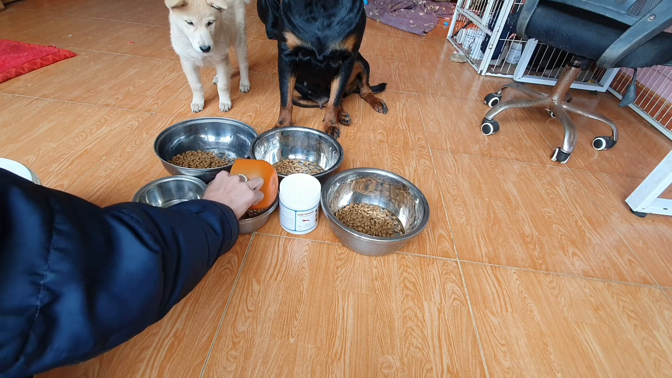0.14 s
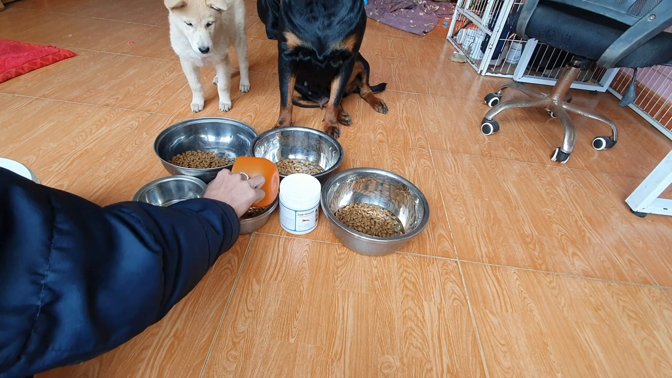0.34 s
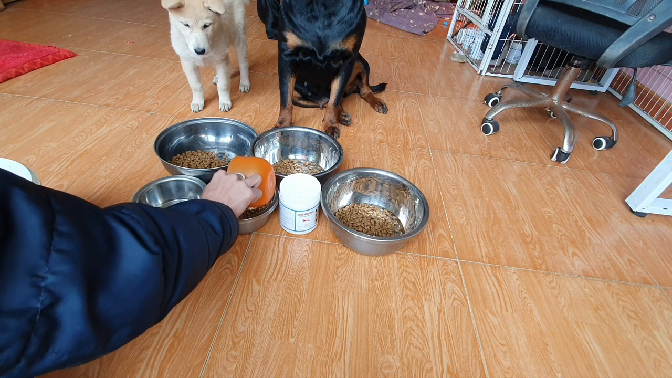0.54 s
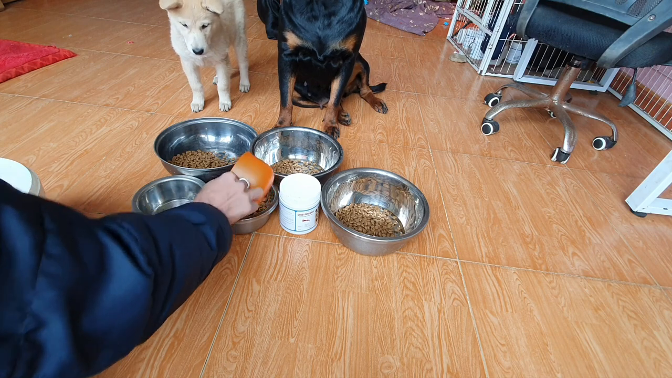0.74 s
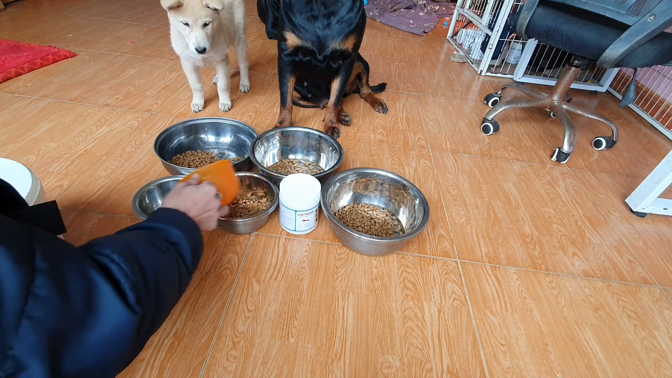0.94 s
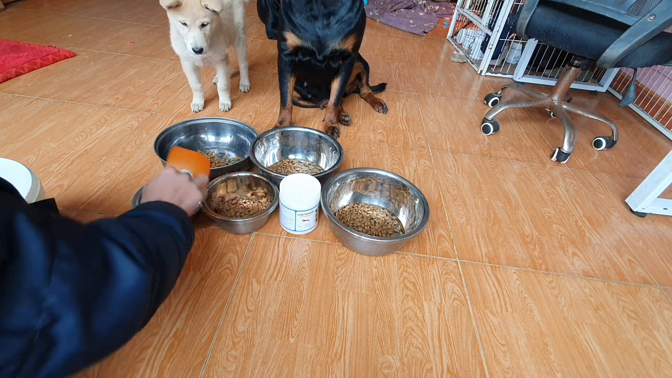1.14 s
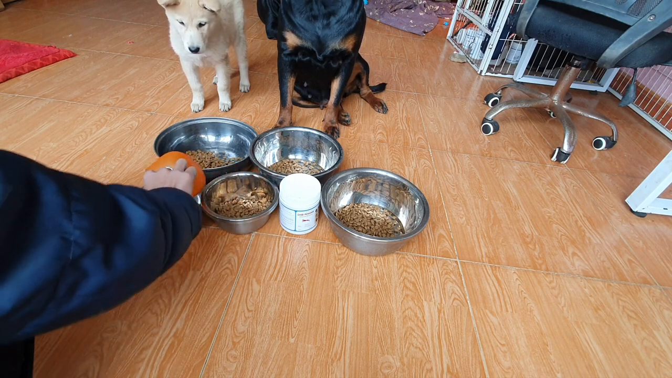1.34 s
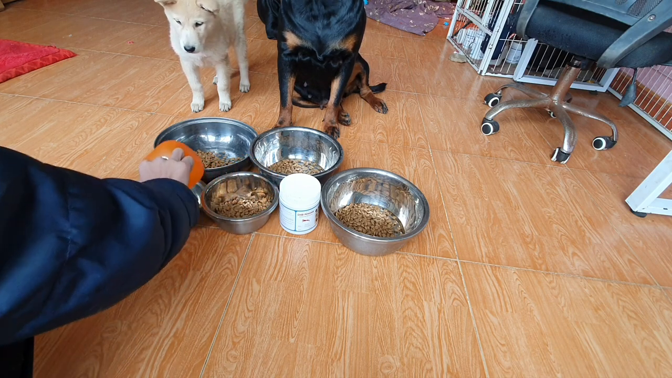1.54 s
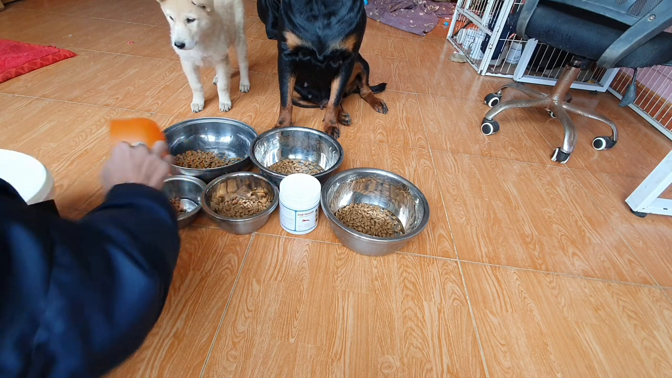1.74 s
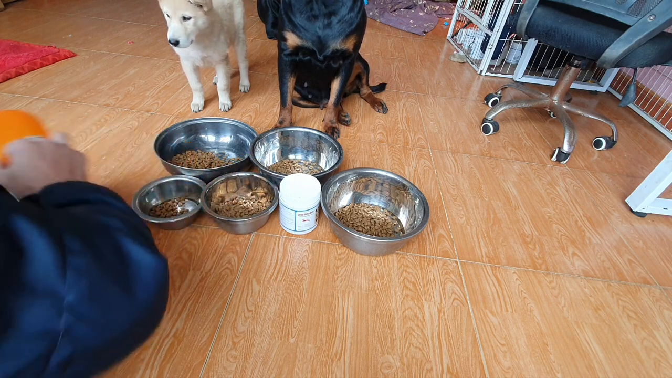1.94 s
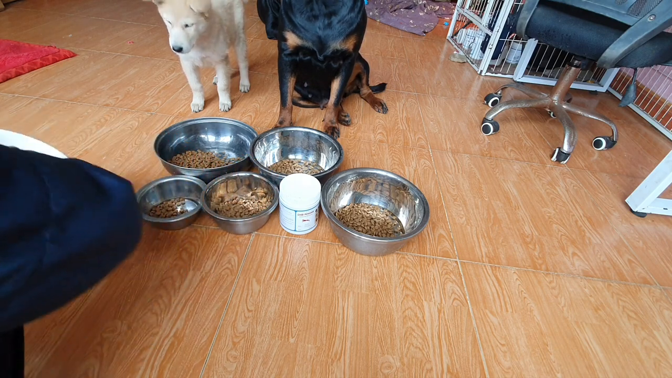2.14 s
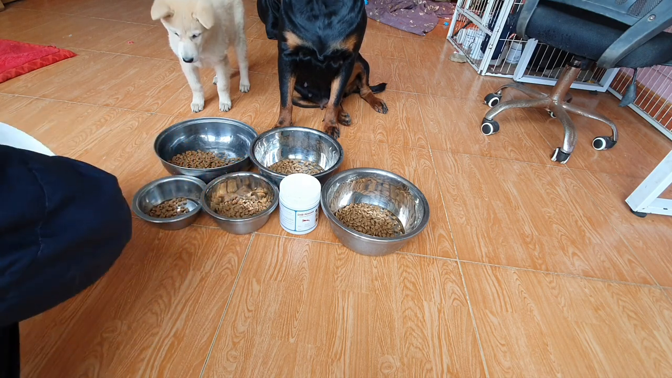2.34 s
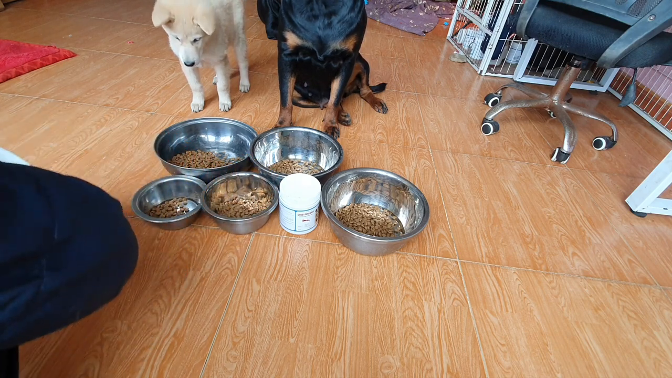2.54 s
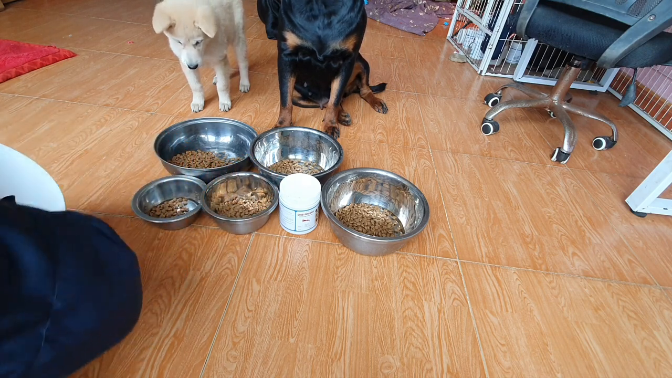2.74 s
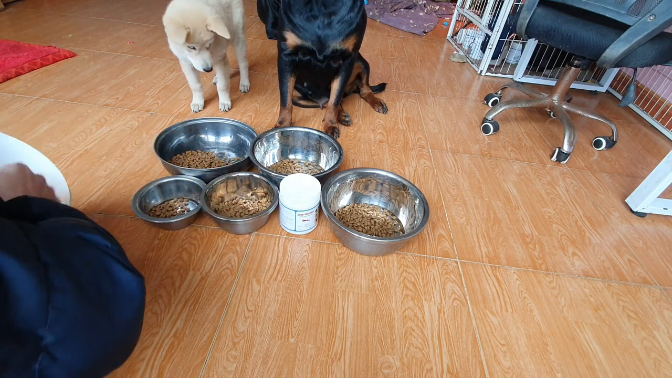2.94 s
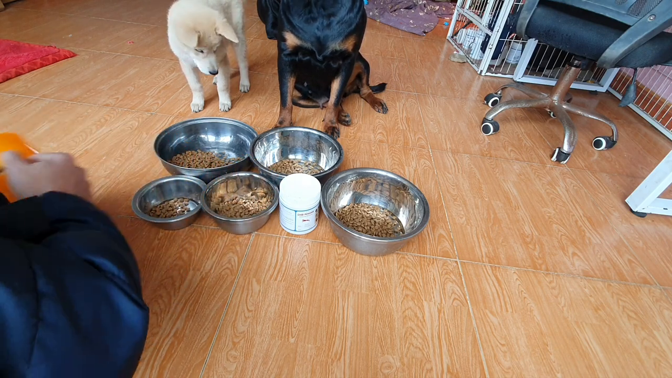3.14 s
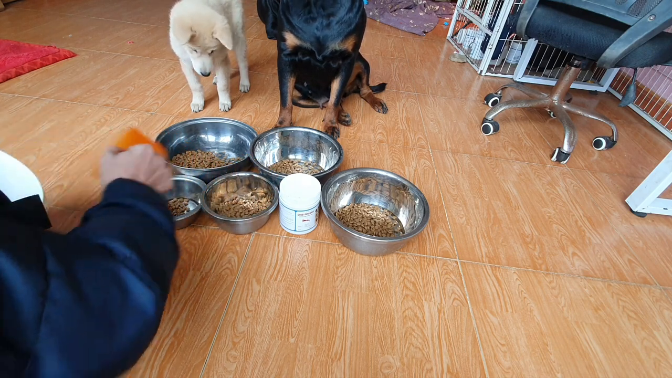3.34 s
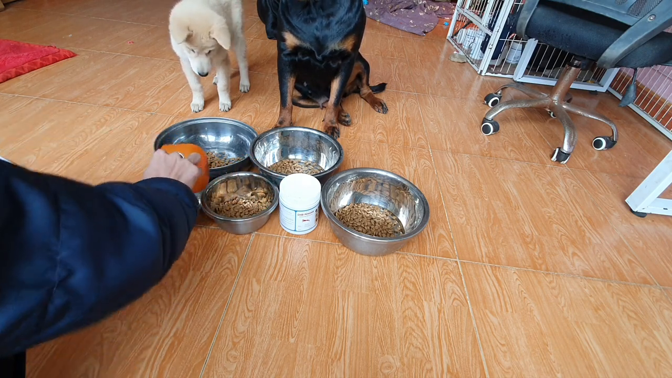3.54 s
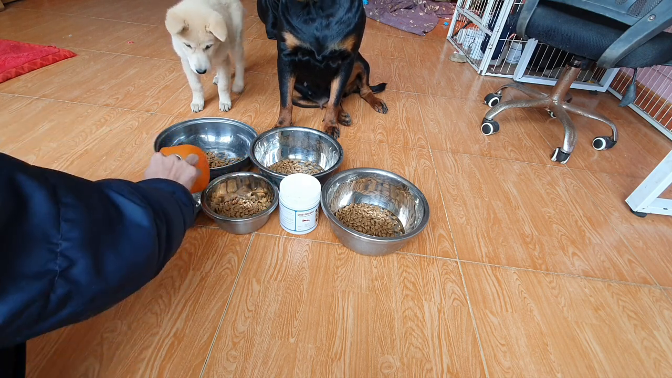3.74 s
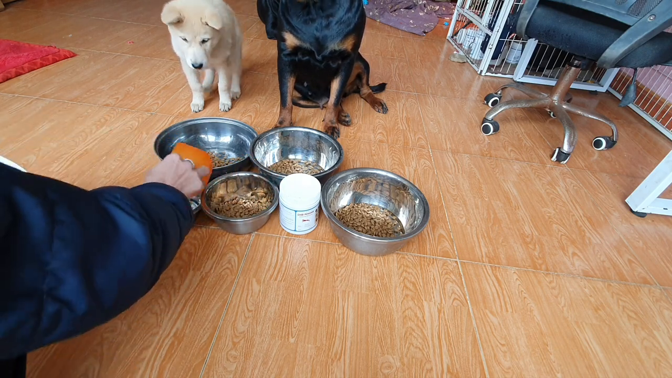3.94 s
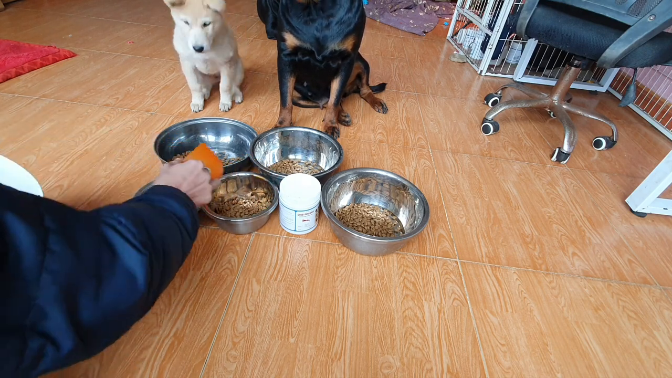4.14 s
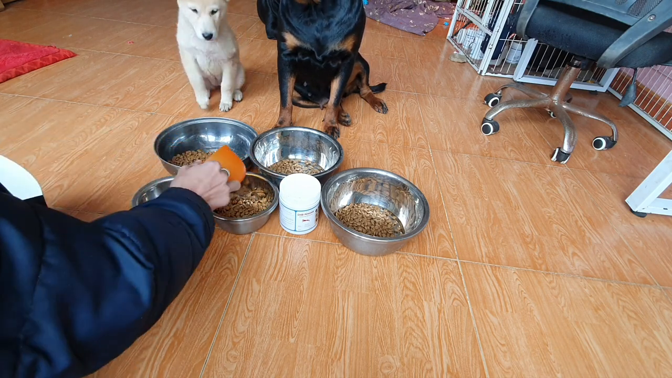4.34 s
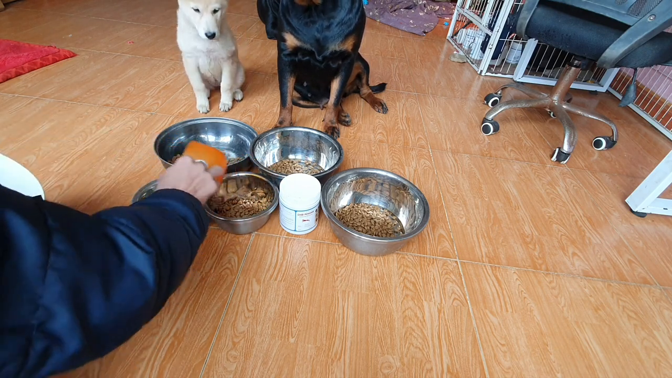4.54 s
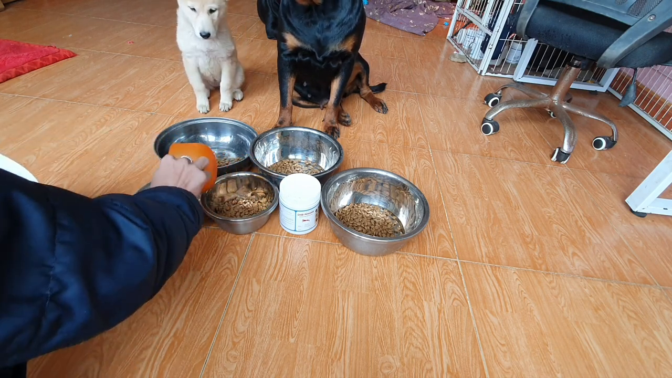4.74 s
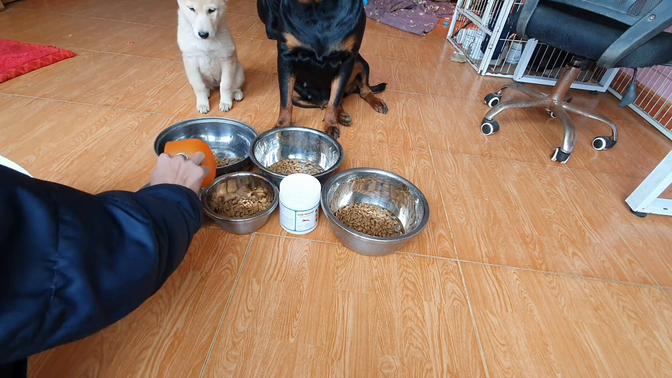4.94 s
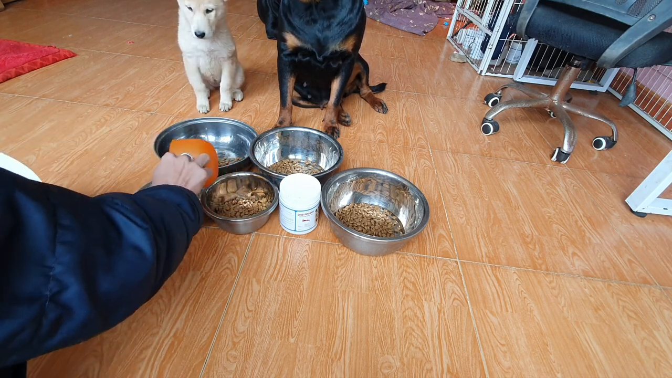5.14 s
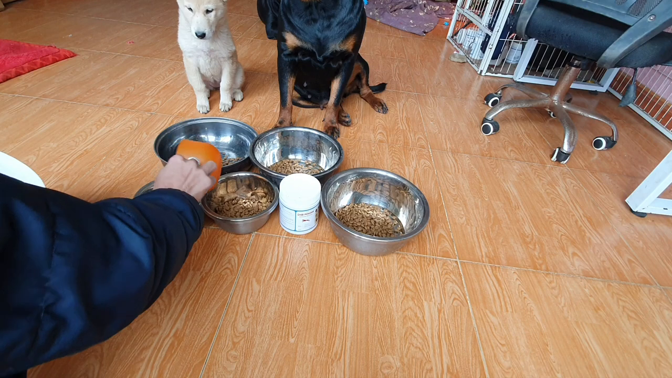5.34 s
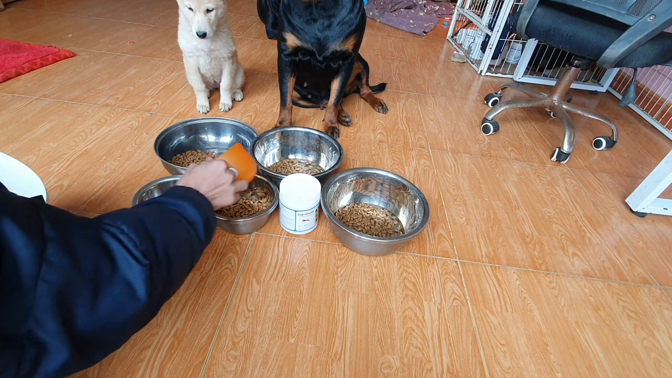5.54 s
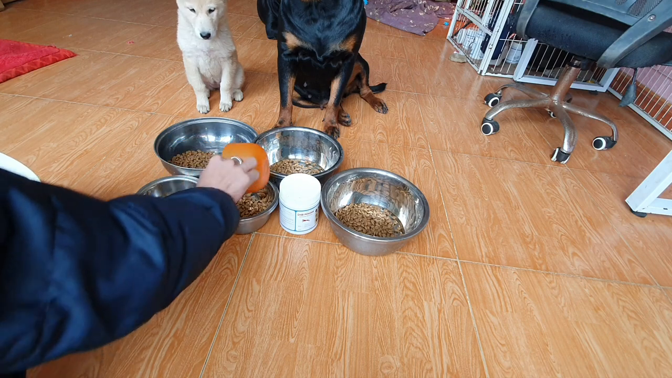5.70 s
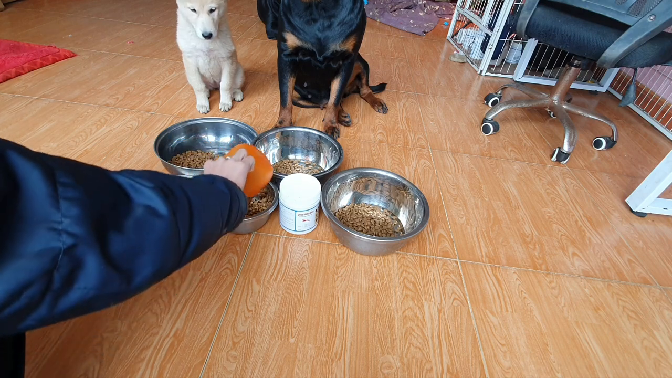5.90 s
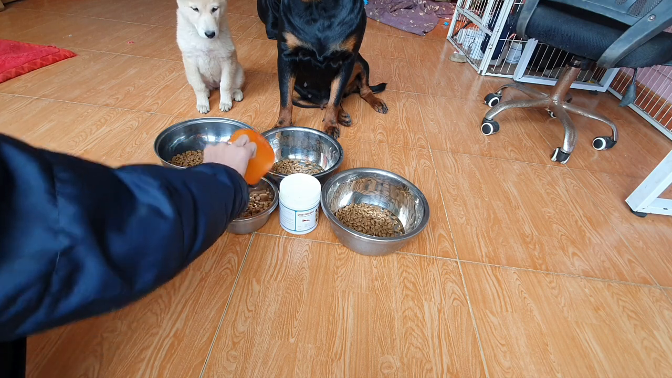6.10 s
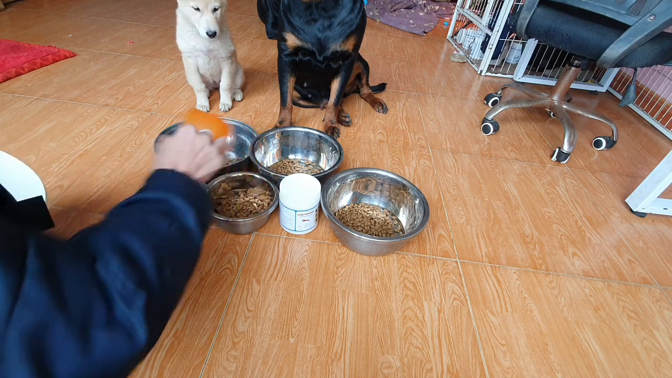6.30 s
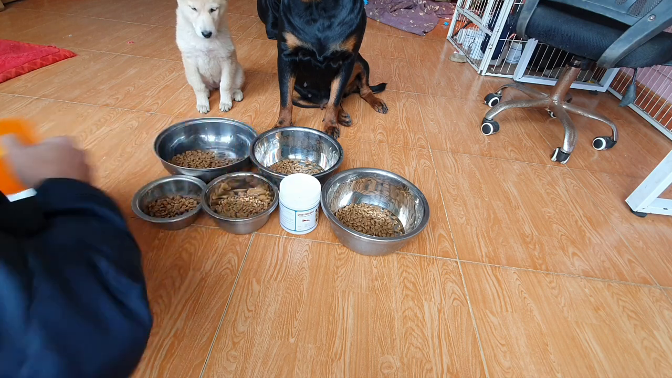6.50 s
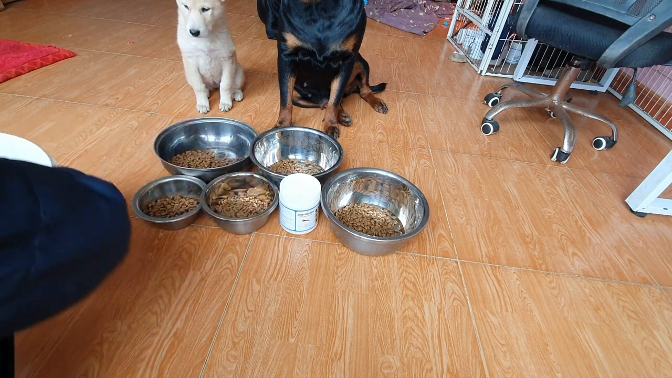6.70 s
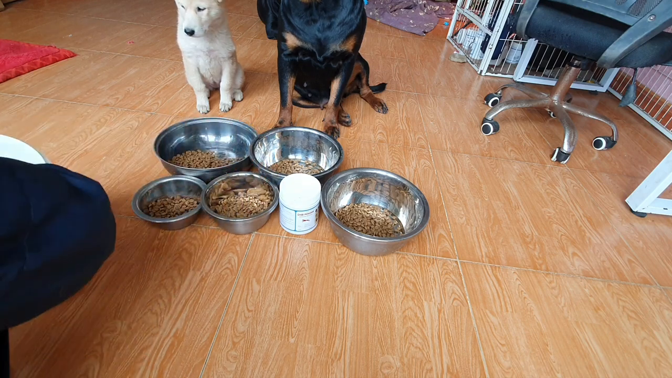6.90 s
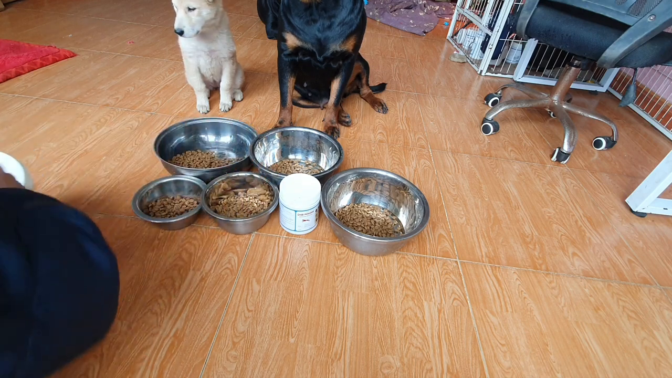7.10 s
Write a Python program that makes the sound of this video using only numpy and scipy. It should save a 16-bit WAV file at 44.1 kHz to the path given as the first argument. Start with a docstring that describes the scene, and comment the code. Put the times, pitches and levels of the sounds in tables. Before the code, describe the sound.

A small, hard-floored room with a faint low hum, heard in stereo from close by. From 0 to 1.2 seconds thin runs of dry pet food trickle off a plastic scoop into a small steel bowl, with scattered bright chinks, the sharpest near 0.5. At 1.5 the rest drops in a dense, short rattle. Soft bumps and sleeve swishes follow. From 2.2 to 3.1 the scoop digs into a plastic bucket at left: coarse crunching, snapping pieces, boomy wall and hollow knocks around 2.4 and 2.6. A thud comes at 3.5. From 3.7 to 4.4 food slides and pours with crackle, patter and light bowl taps; a quieter pour runs 5.1 to 5.6. Around 6.1 a last spill clinks brightly while the sleeve drags over a large bowl, making it ring faintly. After a swish, digging resumes at 6.8, with a strong bucket knock at 7.0, grinding on to the end.

```python
"""Pet food shaken into steel bowls

Dry food falls from a plastic scoop into steel bowls, in a room with a faint hum.
Running food is made of many tiny noise cracks; bowls, scoop and bucket ring as sums of dying sines.
A sleeve, made of dense fine grains, swishes and drags over a large bowl, setting it ringing.
Twice the scoop digs into a plastic bucket on the left: grinding grains, knocks and a booming wall."""
import sys
import numpy as np
from scipy import signal
from scipy.fft import rfft, irfft
from scipy.io import wavfile

SR = 44100
rng = np.random.default_rng(int(sys.argv[2]) if len(sys.argv) > 2 else 0)


def master_out(mix):
    """Clip the mix to full scale and print it as 16-bit PCM to the path in sys.argv[1]."""
    frames = np.transpose(np.atleast_2d(mix))
    ceiling = np.clip(frames, -1, 1)
    pcm = np.round(ceiling * 32767).astype(np.int16)
    wavfile.write(sys.argv[1], SR, pcm)


N = 320273
T = np.arange(N) / SR  # time in seconds

# Levels in the tables are relative: each layer adds its own gain. t60_s and fade_s: time to fall by 60 dB.
# thin runs of food into the small bowl: start_s, rise_s, hold_s, fade_s, crackle_db, heap_patter_db
TRICKLES = [(0.0, 0.0011, 0.32, 0.89, -63.5, -60.5), (0.33, 0.081, 0.14, 1, -59, -70),
            (0.705, 0.0047, 0.21, 0.55, -62.5, -71.5), (6.105, 0.005, 0.034, 0.43, -53.5, -51)]
# dense streams into the part-filled bowl: start_s, rise_s, hold_s, fade_s, crackle_db, heap_patter_db
POURS = [(3.79, 0.081, 0.08, 0.76, -53.5, -48), (5.095, 0.042, 0.19, 0.38, -61.5, -53.5)]
# the rest of the scoop tipped out: start_s, rise_s, hold_s, fade_s, rattle_db, heap_patter_db
DUMP = [(1.412, 0.061, 0.065, .2, -69, -62.5), (1.499, 0.0032, 0.024, 0.42, -35.5, -34.5)]
# food sliding inside the tipped or jerked scoop: start_s, rise_s, hold_s, fade_s, level_db
SLIDES = [(1.385, 0.045, 0.038, 0.2, -50), (3.68, 0.08, 0.011, 0.17, -50), (4.295, 0.017, 0.13, 0.1, -65.5),
          (4.725, 0.0029, 0.0054, 0.16, -64), (4.843, 0.009, 0.011, 0.086, -68),
          (5.454, 0.0039, .01, 0.13, -71.5), (5.661, 0.0015, 0.0036, 0.1, -45.5),
          (5.925, 0.073, 0.042, 0.71, -51.5)]
# strokes of the scoop through the food in the bucket: start_s, rise_s, hold_s, fade_s, crunch_db, wall_boom_db
DIGS = [(2.16, 0.011, 0.094, 0.23, -54, -58), (2.378, 0.012, 0.12, 1, -33.5, -28),
        (2.68, 0.14, 0.071, 0.34, -35.5, -31.5), (2.93, 0.031, 0.032, 0.15, -47, -41.5),
        (6.815, 0.016, .005, 0.098, -42, -33.5), (6.9, 0.037, 0.0065, 0.089, -50, -50),
        (6.988, 0.014, 0.0071, 0.48, -44, -22.5)]
# the sleeve swishing through the air: start_s, rise_s, hold_s, fade_s, level_db
SWISHES = [(0.0, 0.077, 0.28, 2.1, -61), (1.655, 0.011, 0.2, 0.49, -54.5),
           (1.968, 0.0041, 0.0038, 0.59, -52), (5.92, 0.15, 0.037, 0.33, -57),
           (6.615, 0.016, 0.2, 0.26, -58.5)]
# the sleeve dragging over the rim of the large bowl: start_s, rise_s, hold_s, fade_s, level_db
BRUSH = [(5.992, 0.014, 0.097, 0.21, -45), (6.07, 0.065, 0.25, 0.98, -46)]
# pieces on the bare small bowl: start_s, splash_db, splash_tilt_db_per_octave, ring_db, ring_tilt_db_per_octave
CHINKS = [(0.0402, -29, 8, -43, -3.5), (0.2311, -33.5, 11, -52, -2), (0.2552, -31, -12, -36, -0.5),
          (0.3648, -38, 8, -52, -3), (0.38, -34, 16, -52, -4), (0.4276, -44, -7, -35, 1.5),
          (0.5233, -19, -11, -23, 3.5), (0.8172, -29.5, -30, -32, -0.5), (0.9244, -35, -3, -33, -1.5),
          (0.9801, -29, 25, -46, 7), (6.101, -25, 3, -34, 2), (6.1145, -31, 23, -44, 2),
          (6.134, -17, 7, -29, -5.5), (6.1677, -38, 4, -41, 2), (6.2343, -43.5, -18, -50, 2)]
# taps of the scoop's rim on the part-filled bowl:
# start_s, splash_db, splash_tilt_db_per_octave, ring_db, ring_tilt_db_per_octave
FILLED_BOWL_TAPS = [(3.937, -52, -6, -44, 15), (3.971, -34.5, 0, -41, -3), (4.088, -39, 9, -43, 14),
                    (4.27, -57, 0, -56.5, -4)]
# clumps of food clacking against the scoop: start_s, level_db, treble_db (added to level_db)
CLACKS = [(0.363, -37.5, -3.5), (0.399, -45.5, -23), (0.7596, -41.5, -2), (0.9967, -40.5, -11),
          (1.505, -31.5, 0), (1.742, -50.5, -3), (2.576, -34.5, -0.5), (2.599, -29.5, -8), (2.731, -33, -9),
          (2.775, -31.5, -5), (2.795, -30.5, -8), (2.852, -27.5, -10.5), (2.8921, -31.5, -13),
          (2.981, -47.5, -20.5), (3.016, -36.5, -25), (3.287, -62.5, -6.5), (3.885, -46, -1),
          (3.936, -44, 2.5), (4.049, -46.5, -4), (4.09, -44, 4.5), (4.12, -43.5, -1.5), (4.383, -51, 7),
          (5.102, -59.5, 2.5), (5.133, -49.5, -14), (5.245, -47, -5), (5.302, -53, 3), (5.374, -48, -7),
          (5.476, -60, -3), (5.662, -44.5, 5)]
# stabs of the scoop into the food: start_s, crunch_db, bright_snap_db
STABS = [(2.243, -40, -77), (2.305, -36.5, -47), (2.344, -29.5, -37), (2.386, -28.5, -35),
         (3.504, -42, -88), (6.827, -35.5, -70), (6.96, -36, -50), (6.996, -30.5, -69)]
# knocks on the bucket: start_s, level_db, ring_time_factor (no unit), rebound_delay_s, left_minus_right_db
KNOCKS = [(2.386, -16.5, 1.86, 0.016, 7), (2.428, -13, 1.16, 0.02, 9), (2.575, -20, 1.1, 0.032, 1),
          (3.497, -20.5, 0.93, .014, -1), (6.992, -12.5, 0.99, 0.01345, 2.5)]
# soft bumps of arm, knee and scoop; near 600-710 Hz, clumps landing on the heap: start_s, level_db, pitch_hz
BUMPS = [(0.32, -31, 897), (1.68, -29, 145.5), (1.70, -31.5, 315), (1.825, -54, 264), (1.981, -33.5, 135),
         (2.348, -25, 139.5), (2.449, -22.5, 128.3), (3.498, -27, 151), (3.755, -35.5, 128.6),
         (3.809, -33.5, 710), (4.054, -33, 71.6), (5.112, -41, 600), (5.205, -34, 694), (5.578, -43, 626),
         (5.999, -46, 286), (6.963, -28.5, 145.3)]

# ringing tones of the small steel bowl: pitch_hz, level_db, t60_s
SMALL_BOWL = [(867, -6, .25), (1707, -1, .24), (2686, 2.5, 0.22), (3074, 0, 0.3), (3381, 0, 0.092),
              (3635, -1, 0.18), (3930, -6, 0.26), (4312, -10, 0.33), (4790, -11, 0.28), (5771, -13, .28),
              (6196, -3, 0.18), (6300, -6, 0.12), (6780, -6, 0.16), (7000, -7, 0.18), (8680, -5, .17),
              (9130, -2, 0.2), (9350, -2, 0.18), (9800, -5, 0.18)]
# ringing tones of the large steel bowl: pitch_hz, level_db, t60_s
LARGE_BOWL = [(278, 1, .5), (296, 5, 0.7), (474, -8, 0.8), (517, -10, 0.8), (598, -2, .5), (630, 0, 0.7),
              (673, -6, 1.1), (759, -8, 0.78), (829, -11, 1), (862, -8, .7), (974, -2, 0.85),
              (1025, -6, .4), (1104, -1, 0.83), (1244, 3, 0.7), (1324, -7, 1), (1486, -10, .6),
              (1728, -6, .5), (1776, -8, .6), (1890, -4, 0.6), (2105, -5, 0.5), (2196, -5, .5),
              (2650, -2, .3)]
# ringing tones of the part-filled bowl: pitch_hz, level_db, t60_s
FILLED_BOWL = [(760, -8, 0.38), (802, -5.5, 0.52), (2120, 1, 0.34), (2150, 8, 0.52), (3085, 5, 0.28),
               (3080, 9, 0.33), (3478, 5, .25), (5500, 8, 0.1), (5560, -14, .1), (5670, 5, 0.1),
               (6340, -3, .15)]
# ringing tones of the bucket, before the knock's factor: pitch_hz, level_db, t60_s
BUCKET = [(291, -9, 0.4), (322, -5, .13), (350, 2, 0.085), (361, -9, .35), (410, -12, .07),
          (441, -10, 0.13), (484, -11, 0.25), (520, -8, .12), (575, -12, .13), (660, -17, 0.22),
          (800, -12, .12)]
# ringing tones of the plastic scoop: pitch_hz, level_db, t60_s
SCOOP = [(820, -7, .08), (1530, 1, .09), (1595, 1, .13), (2250, -4, .04), (2570, 0, .06), (2850, 2, .12),
         (3074, 3, .13), (3515, 0, .14), (4450, 4, .025), (4680, 3, .025)]

# tone colour of trickling food: pitch_hz, level_db
TRICKLE_COLOUR = [(1000, -2), (1600, 2), (2600, 4.5), (3600, 8), (5000, 3), (6300, 0.5), (7600, -1),
                  (10500, -1.5), (14000, -22)]
# tone colour of poured food: pitch_hz, level_db
POUR_COLOUR = [(1300, -13), (1900, 4.5), (2600, -2.5), (3500, 3), (4200, -3.5), (4900, -7.5), (5900, -7),
               (7500, -12), (10500, -6), (13000, -16), (14500, -20)]
# tone colour of dumped food: pitch_hz, level_db
DUMP_COLOUR = [(760, -25), (1300, -11), (1540, -42), (1850, 4.5), (1970, -4.5), (2130, -1), (2360, -8),
               (2560, 0), (2740, -24), (3030, -2.5), (3360, -16), (3710, -1.5), (4150, -9), (5340, -15.5),
               (12000, -15.5), (14500, -33)]
# tone colour of food sliding in the scoop: pitch_hz, level_db
SLIDE_COLOUR = [(2300, -8), (3200, -5), (3900, 2), (5300, -5.5), (7300, -13), (9600, -5), (12500, -18.5),
                (14500, -32)]
# tone colour of the patter on the heap: pitch_hz, level_db
HEAP_COLOUR = [(350, -10.5), (470, -13), (585, -4.5), (760, -1.5), (830, -9.5), (910, -2.5), (1050, -6),
               (1200, -20.5), (1500, -16.5)]
# tone colour of grinding food: pitch_hz, level_db
CRUNCH_COLOUR = [(400, -3), (560, -8), (660, -3.5), (750, 3.5), (880, 4), (1250, -1.5), (1550, -0.5),
                 (1900, 1), (3400, -8.5), (4500, -14.5), (5800, -30), (7300, -27.5), (9600, -27.5),
                 (12500, -52)]
# tone colour of the booming bucket wall: pitch_hz, level_db
WALL_COLOUR = [(90, -11), (140, -13.5), (198, -22.5), (242, -17.5), (290, -3.5), (345, 3.5), (385, -3),
               (448, -10), (600, -13)]
# tone colour of the swishing sleeve: pitch_hz, level_db
SWISH_COLOUR = [(200, -14), (340, 0), (600, -17), (890, -9), (1230, -15.5), (2630, -12.5), (5400, -31.5),
                (7300, -37), (9600, -27.5), (14000, -50)]
# tone colour of the dragging sleeve: pitch_hz, level_db
BRUSH_COLOUR = [(230, -16), (288, 5), (397, -11), (549, -15), (646, -4.5), (916, -12.5), (1090, -17),
                (1270, -5.5), (1410, -9), (1850, -11), (5000, -42)]
# tone colour of the splash on steel, before tilting: pitch_hz, level_db
CHINK_COLOUR = [(4500, -22.5), (5700, -24), (6200, -7.5), (6900, -3), (7700, -5.5), (8400, -2.5),
                (9200, 11.5), (10200, 2), (11100, 3.5), (12200, -2.5), (14500, -30)]
# tone colour of the body of a clack: pitch_hz, level_db
CLACK_COLOUR = [(300, -16), (700, 8), (1400, -4.5), (2000, -4), (3200, 8.5), (4400, 5.5), (6000, -21),
                (8000, -42), (14000, -42)]
# tone colour of crisp snaps: pitch_hz, level_db
SNAP_COLOUR = [(3000, -21), (5800, 3), (7500, -5), (9500, 8.5), (12500, -11.5), (14500, -26)]
# tone colour of the room's hush: pitch_hz, level_db
HUSH_COLOUR = [(40, -17.5), (59, -5), (141, -20), (222, -20), (300, -22.5), (380, -26), (470, -29.5),
               (650, -41), (1000, -40), (1500, -64), (5000, -64), (14500, -78)]
# tone colour of the room's low rumble: pitch_hz, level_db
RUMBLE_COLOUR = [(28, -28.5), (38, -25), (48, 5), (62, -2), (78, -14.5), (95, -3), (115, -18), (135, -11),
                 (180, -24), (300, -46)]
# level of the low rumble over time: time_s, level_db
RUMBLE = [(0, -55), (1.3, -58.5), (2.9, -53), (5.8, -64), (7.26, -53)]
# hum tones, before they waver: pitch_hz, level_db
HUM = [(48.6, -55.5), (133.5, -72), (291, -77.5), (377.3, -66.5)]
# the room's decay: pitch_hz, t60_s
ROOM = [(150, 0.56), (400, 0.66), (1000, 0.55), (2800, 0.4), (7000, 0.22), (14000, 0.21)]

BOWL_LEAD, BUCKET_LEAD = 7, 16  # samples by which the left ear is early
EAR_DELAY_S = 0.00059  # time that sound takes from one ear to the other
EDGE_HZ = 14700  # upper band limit
HEAP_SETTLE_S = 0.088  # the dumped heap goes on pattering this much longer
CLACK_SCATTER_S, STAB_S = 0.0028, 0.054  # time in which the scatter of a clack or stab falls to 37 %
REBOUND_DB = -2  # rebound of a knock, relative to the blow
BUMP_CYCLES = 16.5  # a bump's main tone dies by 60 dB in this many cycles
BUMP_RISE_CYCLES = 0.8  # a bump swells over this many cycles
RING_PIVOT_HZ = 3500  # a ring is tilted about this pitch
TAP_S, TAP_DB = 0.9965, -46  # the scoop taps the rim of the small bowl
TRICKLE_RING_DB, POUR_RING_DB = -14, -11.5  # how strongly running food sets each bowl singing
RIM_RING_DB = -11.5  # how strongly the dragged sleeve sets the large bowl ringing


def amp(db):
    """Decibels to gain."""
    return 10 ** (np.asarray(db) / 20)


def unit(x):
    """Scales a response to energy 1."""
    return x / np.sqrt(np.sum(x ** 2, -1, keepdims=True) + 1e-20)


def read(points, hz):
    """Reads a table between its points on a log-frequency axis."""
    f, value = np.transpose(points)
    return np.interp(np.log(hz + 1), np.log(f + 1), value)


def add(mix, s, sound):
    """Mixes a sound in at time s."""
    part = mix[max(round(s * SR), 0):][:len(sound)]
    part += sound[:len(part)]


def through(x, response):
    """Passes a sound through a response."""
    return signal.oaconvolve(x, response)[:N]


def pan(left_db):
    """Gains of the two ears for a level difference."""
    return amp([[left_db / 2], [-left_db / 2]])


def colour(x, points):
    """Filter of energy 1, never sounding early, that falls steeply beyond the ends of its table."""
    hz = abs(np.fft.fftfreq(4096, 1 / SR)) + 1
    octaves_beyond = abs(np.log2(hz / np.clip(hz, points[0][0], points[-1][0])))
    gain_db = np.maximum(read(points, hz) - 24 * octaves_beyond, -100)
    # the phase that packs the energy as early as possible
    spectrum = np.exp(np.conj(signal.hilbert(np.log(amp(gain_db)))))
    response = np.fft.ifft(spectrum).real[:len(hz) // 2]
    return through(x, unit(response))


def ring(modes, uneven_db=0, stretch=1):
    """Dying sines, the natural tones of a struck object; uneven_db varies their levels from blow to blow."""
    t = T[:SR]
    out = np.zeros(len(t))
    for hz, db, t60 in modes:
        level_db = db + uneven_db * rng.standard_normal() - 60 * t / (t60 * stretch)
        out += amp(level_db) * np.sin(2 * np.pi * hz * t)
    return out


def grains(per_s, spread_db, count=12):
    """Collisions of hard pieces, rms about 1: many small, a few large, in a dozen kinds of tiny crack."""
    size = amp(spread_db * np.minimum(rng.exponential(1, N), 3.5))
    size *= rng.random(N) < per_s / SR  # chance of a collision at each sample
    size *= rng.choice([-1, 1], N) / np.sqrt(np.mean(size ** 2) + 1e-20)
    kind = rng.integers(0, count, N)
    t = T[:SR // 300]
    spectra = rfft(rng.standard_normal((count, len(t))) * np.exp(-t / 0.00029))
    cracks = irfft(spectra / np.sqrt(np.mean(abs(spectra) ** 2, 0)))  # white when taken together
    return sum(through(size * (kind == k), cracks[k]) for k in range(count))


def burst(scatter_s):
    """A sharp contact of noise with a weaker noise scatter dying away after it."""
    t = T[:SR // 4]
    fade = np.exp(-t / 0.0029) + 0.47 * np.exp(-t / max(scatter_s, .002))
    return rng.standard_normal(len(t)) * fade


def stroke(start, rise, hold, fade):
    """Envelope of one move of the hand: it swells, holds, then dies by 60 dB in the fade time."""
    swell = np.clip((T - start) / max(rise, 1e-3), 0, 1)
    return swell * amp(-60 * np.maximum(T - start - rise - hold, 0) / fade)


def flow(moves, order=0, linger_s=0):
    """Gain over time of a table of moves, from its first (order 0) or second (order 1) dB column."""
    return sum(amp(dbs[order]) * stroke(start, rise, hold + linger_s, fade)
               for start, rise, hold, fade, *dbs in moves)


def reverb(x, count=3):
    """Diffuse tails of noise that take turns four times a second and agree between the ears in the bass."""
    t_tap = T[:SR * 2 // 3]
    taps = rng.standard_normal((2, count, len(t_tap))) * (t_tap > .003)
    hz, t, z = signal.stft(taps, SR, nperseg=512)
    t60 = read(ROOM, hz)[:, None]
    same = np.sinc(2 * hz * EAR_DELAY_S)[:, None]  # likeness of the two ears at each pitch
    z = np.array([z[0], same * z[0] + np.sqrt(1 - same ** 2) * z[1]])
    decaying = z * amp(-60 * t / t60) / np.sqrt(t60)
    tails = unit(signal.istft(decaying, SR, nperseg=512)[1])
    turns = np.maximum(np.cos(2 * np.pi * (4 * T + np.arange(count)[:, None] / count)), 0)
    feeds = x * turns / np.linalg.norm(turns, axis=0)
    return np.array([sum(through(feed, tail) for feed, tail in zip(feeds, ear)) for ear in tails])


def room(x, lead, wet_db):
    """Direct sound, earlier on the left, plus the room's tail at wet_db relative to it."""
    direct = np.array([x, np.pad(x, (lead, 0))[:N]])
    return (direct + amp(wet_db) * reverb(x)) / np.hypot(1, amp(wet_db))


def waver():
    """A slow random wander: straight lines between 30 random values."""
    return np.interp(T, np.linspace(0, T[-1], 30), rng.standard_normal(30))


def background():
    """Wavering hum tones and low filtered noise, nearly alike in both ears, under a faint hush and hiss."""
    hum = np.zeros(N)
    for hz, db in HUM:
        level = np.sqrt(2) * amp(db + 0.65 * waver())
        hum += level * np.sin(2 * np.pi * hz * T + 0.13 * waver())
    rumble_gain = amp(np.interp(T, *np.transpose(RUMBLE)) + 4.5)
    rumble = rumble_gain * colour(rng.standard_normal(N), RUMBLE_COLOUR)
    shared, left, right = (colour(noise, HUSH_COLOUR) for noise in rng.standard_normal((3, N)))
    hush = amp(-62) * shared + amp(-66.5) * np.array([left, right])
    hiss = colour(rng.standard_normal(N), [(200, 2.5), (600, -6.5), (2000, -17.0), (14000, -26.5)])
    wide_hiss = np.array([hiss, hiss[::-1]])  # played backwards on the right, so the ears differ
    return (hum + rumble) * pan(-1) + hush + amp(-70.5) * wide_hiss


def bumps():
    """Dull blows with a soft start, each a cluster of four heavily damped tones; low ones last longer."""
    out = np.zeros(N)
    for s, db, hz in BUMPS:
        t60 = BUMP_CYCLES / hz
        swell = np.minimum(T[:SR] * hz / BUMP_RISE_CYCLES, 1)
        modes = [(hz * 0.855, -6, t60 * 2.44), (hz, 0, t60),
                 (hz * 1.28, -6, t60 * 0.26), (hz * 1.8, -11, t60 * 0.5)]
        add(out, s, amp(db - 1.5) * swell * ring(modes))
    return out


def sleeve():
    """Stiff cloth swishes as dense fine grains; dragged over the rim it sets the large bowl ringing."""
    drag = flow(BRUSH) * grains(1500, 3.5)
    swish = colour(flow(SWISHES) * grains(4000, 2.5), SWISH_COLOUR)
    push = colour(drag, [(250, 4), (1300, 6.5), (2000, -6.5), (4500, -11)])
    singing = through(push, unit(ring(LARGE_BOWL)))
    return amp(4.5) * swish + amp(-1.0) * colour(drag, BRUSH_COLOUR) + amp(RIM_RING_DB) * singing


def bucket():
    """The wall booms under the grinding: the same strokes in a low colour."""
    return amp(-6.0) * colour(flow(DIGS, order=1) * grains(900, 4.8), WALL_COLOUR)


def knocks():
    """A blow on the bucket and its rebound: a thud of damped wall tones, some ringing on longer."""
    out = np.zeros((2, N))
    # a soft blow has no treble, a small wall no bass
    contact = signal.butter(2, [260, 640], "bandpass", fs=SR)
    for s, db, stretch, rebound_s, left_db in KNOCKS:
        thud = amp(db - 12.5) * signal.lfilter(*contact, ring(BUCKET, stretch=max(stretch, .2)))
        for ear, gain, late_s in zip(out, pan(left_db), (0, BUCKET_LEAD / SR)):
            add(ear, s + late_s, gain * thud)
            add(ear, s + late_s + rebound_s, amp(REBOUND_DB) * gain * thud)
    return out + amp(-1) * reverb(out.mean(0))


def crunch():
    """Pieces grind past each other as the scoop ploughs in."""
    return colour(flow(DIGS) * grains(800, 4.6), CRUNCH_COLOUR)


def crackle():
    """Single pieces on top of the ploughed food crack sharply: sparser, brighter grains."""
    cracks = amp(-3.5) * flow(DIGS) * grains(190, 4.2)
    return colour(cracks, [(700, -2), (2000, -1), (4200, -2), (6200, -6),
                           (7600, -15), (10000, -17), (14000, -29)])


def stabs():
    """Each stab of the scoop snaps a batch of pieces loose at once."""
    body, snaps = np.zeros(N), np.zeros(N)
    for s, db, snap_db in STABS:
        add(body, s, amp(db) * burst(STAB_S))
        add(snaps, s, amp(snap_db) * burst(STAB_S))
    return amp(-0.5) * colour(body, CRUNCH_COLOUR) + amp(-9.0) * colour(snaps, SNAP_COLOUR)


def scoop_tap():
    """Hollow plastic on the steel rim: one short, pitched tock."""
    out = np.zeros(N)
    add(out, TAP_S, amp(TAP_DB) * ring(SCOOP))
    return out


def clacks():
    """A clump lands on plastic: a woody clack with a crisp top."""
    body, top = np.zeros(N), np.zeros(N)
    for s, db, treble_db in CLACKS:
        add(body, s, amp(db) * burst(CLACK_SCATTER_S))
        add(top, s, amp(db + treble_db) * burst(CLACK_SCATTER_S))
    return amp(3.0) * colour(body, CLACK_COLOUR) + amp(-1.0) * colour(top, SNAP_COLOUR)


def slides():
    """Pieces skid over the scoop's floor with a short, bright rustle."""
    return amp(-1.0) * colour(flow(SLIDES) * grains(2500, 1.2), SLIDE_COLOUR)


def trickles():
    """A thin run of pieces, which keeps the small bowl faintly singing and patters on the heap."""
    run = flow(TRICKLES) * grains(450, 4.6)
    patter = colour(flow(TRICKLES, order=1) * grains(500, 9.4), HEAP_COLOUR)
    singing = through(run, unit(ring(SMALL_BOWL)))
    return amp(4.0) * colour(run, TRICKLE_COLOUR) + amp(TRICKLE_RING_DB) * singing + amp(1.5) * patter


def pours():
    """A dense stream crackles, patters on the heap and sets the part-filled bowl singing."""
    run = flow(POURS) * grains(1500, 5.5)
    patter = colour(flow(POURS, order=1) * grains(500, 3.5), HEAP_COLOUR)
    singing = through(run, unit(ring(FILLED_BOWL)))
    return amp(5.5) * colour(run, POUR_COLOUR) + amp(POUR_RING_DB) * singing + amp(2.5) * patter


def dump():
    """The rest of the scoop rattles down onto a shallow heap: a few pieces, then all at once."""
    patter = colour(flow(DUMP, order=1, linger_s=HEAP_SETTLE_S) * grains(970, 2.1), HEAP_COLOUR)
    rattle = flow(DUMP) * grains(1100, 4.2)
    return amp(3) * colour(rattle, DUMP_COLOUR) + amp(-1.2) * patter


def tilt(hz, db_per_octave, pivot_hz):
    """Level change in dB that grows with the distance in octaves from a pivot pitch."""
    return db_per_octave * np.log2(hz / pivot_hz)


def steel_hits(hits, bowl):
    """A hard blow on steel: a bright noise splash and the bowl's clear ring, each tilted dull or bright."""
    splash, rings = np.zeros(N), np.zeros(N)
    for s, db, tilt_db, ring_db, ring_tilt_db in hits:
        tilted = [(hz, peak_db + tilt(hz, tilt_db, CHINK_COLOUR[0][0])) for hz, peak_db in CHINK_COLOUR]
        modes = [(hz, mode_db + tilt(hz, ring_tilt_db, RING_PIVOT_HZ), t60) for hz, mode_db, t60 in bowl]
        add(splash, s, amp(db - 6.0) * colour(burst(0.0023), tilted))
        add(rings, s, amp(ring_db - 17) * ring(modes, uneven_db=1.0))
    return np.array([splash, rings])


def scene():
    """Bowls near the middle, the bucket off to the left, all in one room."""
    digging = room(crunch(), BUCKET_LEAD, wet_db=10.0)
    cracks = room(crackle() + stabs(), BUCKET_LEAD, wet_db=-1)
    boom = room(bucket(), BUCKET_LEAD, wet_db=-3.5) * pan(2.9)
    hits = room(clacks() + bumps() + scoop_tap(), BOWL_LEAD, wet_db=1.5)
    rustles = room(trickles() + slides() + sleeve(), BOWL_LEAD, wet_db=3.0)
    streams = room(dump() + pours(), BOWL_LEAD, wet_db=0.5)
    splash, rings = steel_hits(CHINKS, SMALL_BOWL) + steel_hits(FILLED_BOWL_TAPS, FILLED_BOWL)
    steel = room(splash, BOWL_LEAD, wet_db=3.0) * pan(-2.8) + room(rings, BOWL_LEAD, wet_db=0.5)
    return background() + knocks() + digging + cracks + boom + hits + rustles + streams + steel


def record(dry):
    """The microphone's low cut, then the recorder's band limit."""
    thinned = signal.lfilter(*signal.butter(4, 36, "highpass", fs=SR), dry)
    band_limit = signal.firwin(401, EDGE_HZ, window=("kaiser", 8), fs=SR)
    return signal.oaconvolve(thinned, band_limit[None], "same")


dry = scene()
out = record(dry)
master_out(out)
```